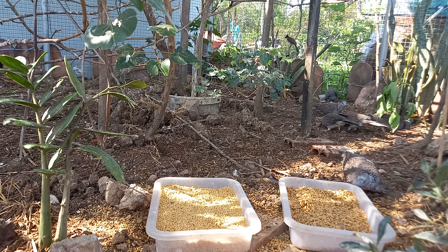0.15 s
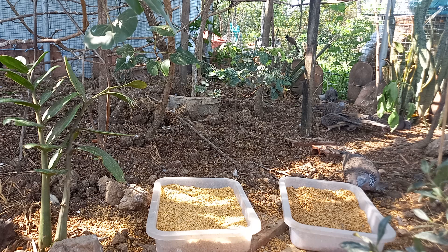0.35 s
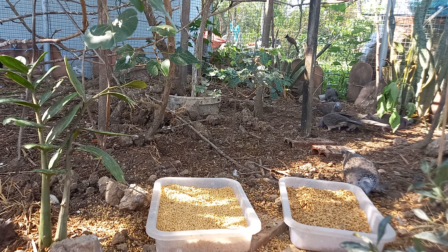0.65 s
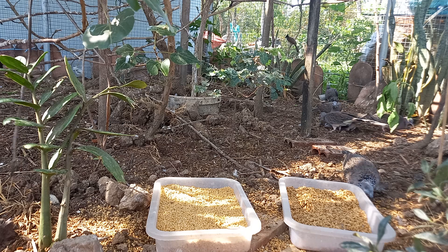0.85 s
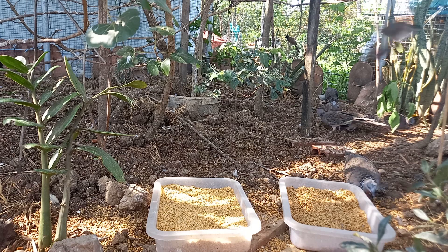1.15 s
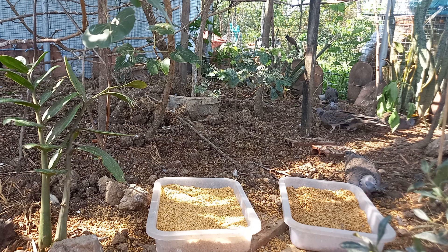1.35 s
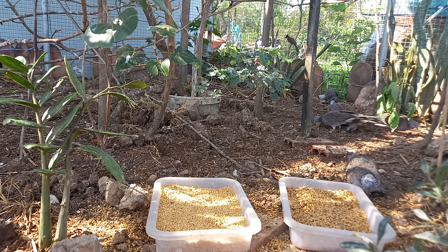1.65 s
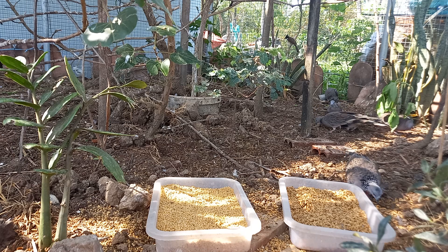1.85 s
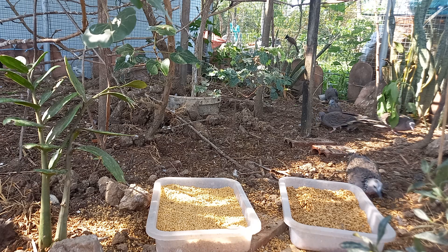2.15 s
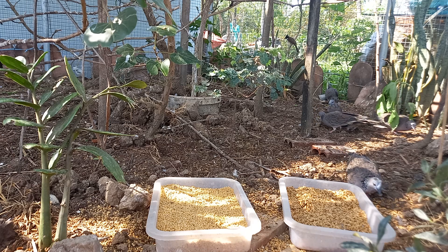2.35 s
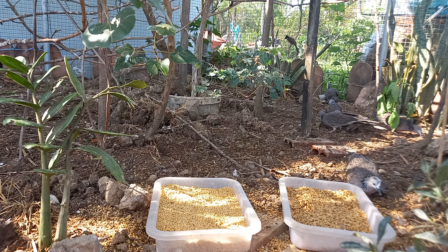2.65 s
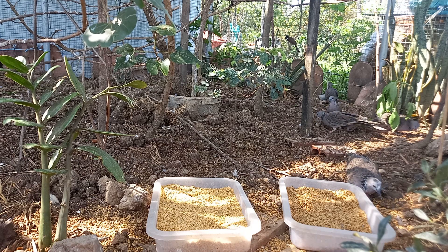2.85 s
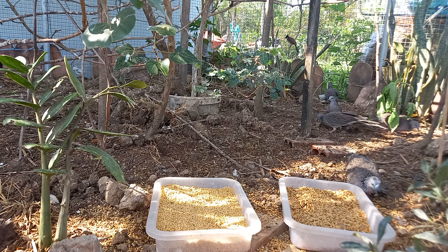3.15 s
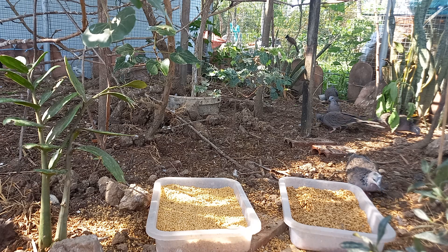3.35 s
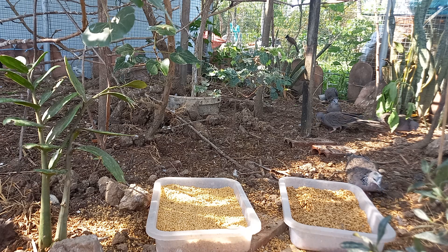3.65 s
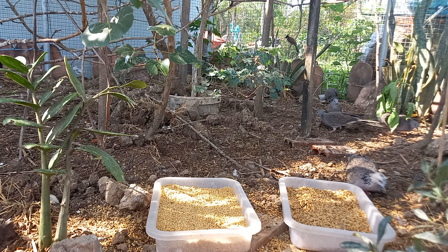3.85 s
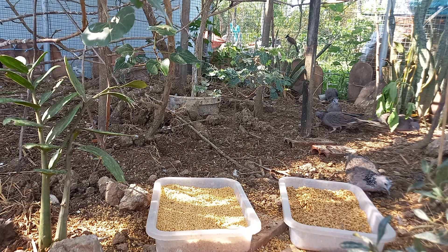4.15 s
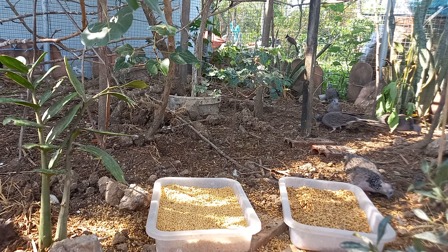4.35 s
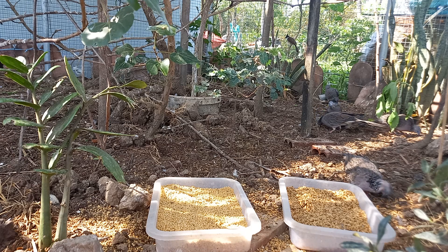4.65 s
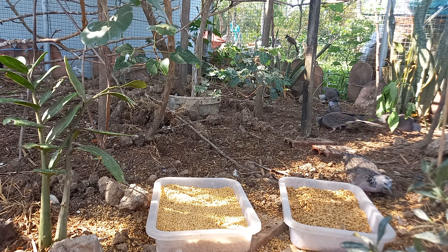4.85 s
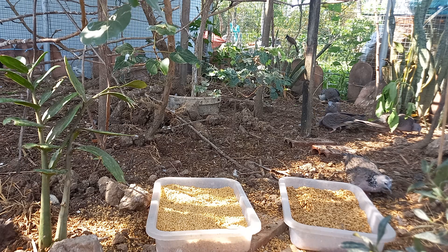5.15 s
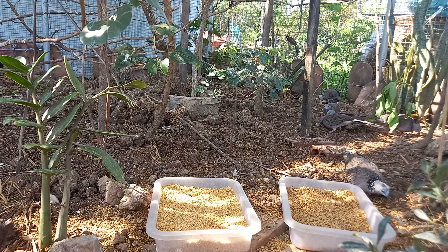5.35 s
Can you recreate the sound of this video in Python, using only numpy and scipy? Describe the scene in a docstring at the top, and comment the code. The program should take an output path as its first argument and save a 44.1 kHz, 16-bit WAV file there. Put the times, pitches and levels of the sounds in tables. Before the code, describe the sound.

Small birds whistle and chirrup sharply in an outdoor aviary while a dove coos, with a short burst of wing flapping midway.

```python
"""Small birds whistle, warble and rasp from several perches in an outdoor aviary while doves coo.
Each voice is a warbling tone in a band of rasp, bent along arch-shaped notes or three-pulse coos.
Shaped noise makes the rest: feet and beaks scratch in seed and dry litter, and one bird takes off
with a burst of wingbeats, its wing tips snapping against twigs. Low rumble and leaf hiss lie
underneath; walls and roof give a short echo, different at each of the two microphones."""
import sys
import numpy as np
from scipy import signal
from scipy.fft import rfft, irfft, next_fast_len
from scipy.io import wavfile
from scipy.ndimage import map_coordinates

SR = 44100
rng = np.random.default_rng(int(sys.argv[2]) if len(sys.argv) > 2 else 0)


def materialize(psi):
    """Save the field psi as 16-bit PCM at rate SR to the path in sys.argv[1].

    A 1-D psi becomes a single channel; in a 2-D psi each row is a channel.
    """
    bounded = np.clip(np.atleast_2d(psi).T, -1, 1)
    quanta = np.round(bounded * 32767).astype(np.int16)
    wavfile.write(sys.argv[1], SR, quanta)


N = 242978
TIME = np.arange(N) / SR  # s


def amp(db):
    """Decibels to gain."""
    return 10 ** (np.asarray(db) / 20)


def unit(x):
    """Scale to rms 1."""
    return x / np.sqrt(np.mean(x ** 2) + 1e-20)


def along(points, hz):
    """Read a curve of (Hz, value) points on a log frequency axis."""
    f, v = np.transpose(points)
    return np.interp(np.log(hz + 1), np.log(f + 1), v)


def wobble(rate, size=N):
    """A smooth random curve through normal random knots, rate knots a second."""
    knots = rng.standard_normal(int(size * rate / SR) + 4)
    return map_coordinates(knots, [np.arange(size) * rate / SR])


def filtered(x, response):
    """Multiply the spectrum of x by a complex response of frequency."""
    m = next_fast_len(N + SR // 2)
    return irfft(rfft(x, m) * response(np.fft.rfftfreq(m, 1 / SR)), m)[..., :N]


def rush(spectrum, side_db):
    """Coloured stereo noise of rms 1; side_db sets its width."""
    white = rng.standard_normal((2, N))
    mid, side = filtered(white, lambda hz: amp(along(spectrum, hz)) * hz / (hz + 10))
    side = amp(side_db) * side
    return unit(np.array([mid + side, mid - side]))


def echo(x):
    """Diffuse answer of walls and roof: decaying noise, strong at first from near surfaces."""
    # Each row: frequency in Hz, time in s for the long part of the echo to fall by 60 dB.
    decay_times = [(200, 0.25), (700, 0.65), (3000, 0.29), (6000, 0.35), (14000, 0.067)]
    hz, t, noise = signal.stft(rng.standard_normal((2, SR // 2)), SR, nperseg=256)
    long_part = amp(-60 * t / along(decay_times, hz)[:, None])
    near_part = 3.5 * amp(-60 * t / .09)
    tail = signal.istft(noise * (long_part + near_part), SR, nperseg=256)[1]
    tail = tail / np.linalg.norm(tail, axis=1, keepdims=True)
    delayed = np.pad(x, (SR // 400, 0))  # 2.5 ms
    return signal.fftconvolve(delayed[None], tail, axes=1)[:, :N]


def perch(x, lag_ms, pan_db, direct_db, echo_db):
    """Place a bird: the left microphone hears it lag_ms later and pan_db louder than the right."""
    sides = np.array([[.5], [-.5]])

    def late(hz, ms):
        return np.exp(-2j * np.pi * hz * ms / 1000)

    def wall(hz):  # one bright reflection, which beats against gliding notes
        return amp(-10.5) * hz / (hz + 1200) * late(hz, 13 + 0.43 * sides)

    direct = filtered(x, lambda hz: late(hz, sides * lag_ms) + wall(hz))
    return amp(direct_db + sides * pan_db) * direct + amp(echo_db) * echo(x)


def arches(rows, fade_db, fade_power, bend_power, edge_rasp):
    """(times, Hz, dB, rasp) of each note: away from its crest it bends in pitch, weakens, turns hoarser."""
    notes = []
    for crest, rise, fall, start_hz, crest_hz, end_hz, db, rasp in rows:
        t = TIME[(TIME > crest - rise) & (TIME < crest + fall)]
        away = np.maximum((crest - t) / rise, (t - crest) / fall)  # 0 at the crest, 1 at the ends
        outer_hz = np.where(t < crest, start_hz, end_hz)
        hz = crest_hz + (outer_hz - crest_hz) * away ** bend_power
        level_db = db - fade_db * away ** fade_power
        roughness = rasp + edge_rasp * away * np.where(t < crest, 1, .5)
        notes.append((t, hz, level_db, roughness))
    return notes


def voice(notes, warble_hz, swing, flutter_db, rasp_db, rasp_ratio, rasp_width_hz, lowest_hz, overtones=()):
    """A syrinx: a warbling tone inside a band of rasp, which the throat cuts off below lowest_hz."""
    clear, hoarse = np.zeros((2, N))
    for t, hz, db, rasp in notes:
        span = np.searchsorted(TIME, t)
        rasp = np.clip(rasp, 0, 1)

        def chance(rate):
            return wobble(rate, size=len(t))

        warble = np.sin(2 * np.pi * np.cumsum(warble_hz * (1 + .2 * chance(59.77))) / SR)
        waver = .22 * chance(110) + rasp * (warble + .5 * chance(3 * warble_hz))  # even clear notes wander
        phase = 2 * np.pi * np.cumsum(hz * (1 + swing * waver)) / SR

        def fuzzy(k):  # a noise band around k times the pitch
            return chance(rasp_width_hz) * np.cos(k * phase) + chance(rasp_width_hz) * np.sin(k * phase)

        tone = np.sin(phase) + sum(amp(level) * fuzzy(round(k)) for k, level in overtones)
        edge = np.clip(np.minimum(t - t[0], t[-1] - t) / 0.0058, 0, 1)  # ramps of 5.8 ms
        gate = np.sin(np.pi / 2 * edge) ** 2
        throb_db = flutter_db * rasp * (warble + .5 * chance(warble_hz))  # loudness follows the warble
        effort = gate * amp(db + throb_db)
        clear[span] += effort * np.sqrt(2 - 1.5 * rasp ** 2) * tone  # rasp takes strength from the tone
        hoarse[span] += effort * rasp * fuzzy(rasp_ratio)
    return clear + amp(rasp_db) * filtered(hoarse, lambda hz: 1 - 1 / (1 + (hz / lowest_hz) ** 20))


def outdoors():
    """Distant rumble that wavers a little and a soft hiss of leaves that comes and goes, both shaped noise."""
    # Spectrum of the rumble. Each row: frequency in Hz, relative level in dB per Hz.
    rumble_spectrum = [(13, -49.5), (22, -22.5), (38, -1.5), (92, 2), (311, -20.5), (443, -21.5),
                       (502, -20), (631, -23.5), (689, -24.5), (1110, -35.5), (1330, -51), (1500, -51),
                       (1950, -59), (3300, -120)]
    # Spectrum of the leaves. Each row: frequency in Hz, relative level in dB per Hz.
    leaf_spectrum = [(1000, -12), (2400, -11), (3700, -0.5), (5000, -5.5), (6500, -13), (10000, -16.5),
                     (16000, -31.5)]
    # Coming and going of the leaves. Each row: time in s, level in dB before the leaf gain.
    leaf_levels = [(0.0, -65.5), (0.54, -69), (0.75, -69.5), (1.09, -69.5), (1.26, -79.5), (1.47, -72.5),
                   (1.64, -67.5), (2.19, -79), (3.85, -62), (3.96, -64), (4.14, -73.5), (4.54, -70),
                   (4.66, -75.5), (4.88, -72), (4.99, -66), (5.51, -73.5)]
    leaf_gain_db, rumble_level_db = 6, -59
    hiss_db = np.interp(TIME, *np.transpose(leaf_levels)) + leaf_gain_db
    rumble = amp(rumble_level_db + 2.6 * wobble(17.0)) * rush(rumble_spectrum, side_db=-12.5)
    hiss = amp(hiss_db + 1.8 * wobble(9)) * rush(leaf_spectrum, side_db=0.5)
    return rumble + hiss


def wings():
    """Each wingbeat pushes air and swishes feathers, easing away from a crest; tips snap against twigs."""
    # Wing tips striking twigs. Each row: start in s, relative level in dB.
    snap_hits = [(3.6319, -31.5), (3.7151, -22), (3.8857, -47)]
    # Low push of air. Each row: frequency in Hz, relative level in dB per Hz.
    push_spectrum = [(15, -40), (25, -20.5), (58, -1), (75, -6), (237, -21.5), (306, -29), (400, -34),
                     (520, -50), (880, -120)]
    # Whoosh of the beat. Each row: frequency in Hz, relative level in dB per Hz.
    whoosh_spectrum = [(150, -10.5), (300, -9.5), (550, 10), (850, -7.5), (1150, 3), (1600, -13),
                       (3000, -11), (6000, -24.5)]
    # Feather rustle, also the colour of the snaps. Each row: frequency in Hz, relative level in dB per Hz.
    feather_spectrum = [(1000, -14), (3000, 3.5), (5000, -6), (7000, -8.5), (10000, -10.5), (13000, -3.5),
                        (16000, -12)]
    takeoff_s, landed_s, ramp_s = 3.55, 4.22, 0.071  # start, end and fade of the flight
    crest_s, spread_s = 3.812, .25  # hardest beating, time to either side in which it eases
    flap_hz = 24.97  # mean wingbeat rate

    flying = np.clip(np.minimum(TIME - takeoff_s, landed_s - TIME) / ramp_s, 0, 1)
    ease = ((TIME - crest_s) / spread_s) ** 2
    beat = np.sin(2 * np.pi * np.cumsum(flap_hz * (1 + 0.019 * wobble(8))) / SR)

    def swell(top_db, ease_db, beat_db, rough_db):
        return amp(top_db - ease_db * ease + beat_db * beat + rough_db)

    push = swell(top_db=-41.0, ease_db=13.0, beat_db=-1.0, rough_db=3.7 * wobble(22.14))
    push = push * rush(push_spectrum, side_db=-16.0)
    whoosh = swell(top_db=-46.5, ease_db=17.5, beat_db=3.0, rough_db=2.2 * wobble(35))
    whoosh = whoosh * rush(whoosh_spectrum, side_db=-10.5)
    rustle_db = 2.6 * wobble(900) + 1.2 * wobble(70)
    feathers = swell(top_db=-49.5, ease_db=5.5, beat_db=1.2, rough_db=rustle_db)
    feathers = feathers * rush(feather_spectrum, side_db=2)

    snaps = np.zeros(N)
    for start, db in snap_hits:
        age = np.maximum(TIME - start, 0)
        decay = amp(-60 * age / 0.018) + 0.84 * amp(-60 * age / .13)  # a sharp crack and a longer rattle
        snaps += (TIME > start) * amp(db - 9.0) * decay
    return flying * (push + whoosh + feathers) + snaps * rush(feather_spectrum, side_db=1)


def scratching():
    """Feet and beaks stir dry grains: brief pecks start at once, long scrapes swell, single husks tick."""
    # Pecks and scrapes in seed and litter. Each row: start in s, relative level in dB, length in s.
    stroke_rows = [(.778, -69, .027), (.905, -72.5, .53), (1.086, -67.5, .048), (1.178, -60, .03),
                   (1.982, -66.5, .053), (2.258, -72, .064), (2.476, -62, .046), (2.838, -62, .094),
                   (3.058, -65.5, .046), (3.12, -61.5, .084), (3.163, -62, .041), (3.297, -55, .027),
                   (3.363, -58.5, .16), (4.432, -61.5, .033), (4.506, -59.5, .041), (5.206, -71, .25)]
    # Dry litter. Each row: frequency in Hz, relative level in dB per Hz.
    litter_spectrum = [(600, -13.5), (2000, -2.5), (4500, 0.5), (7000, 2), (9500, 0.5), (12000, -1),
                       (16000, -1.5)]
    stroke = np.zeros(N)
    for start, db, length in stroke_rows:
        age = np.maximum(TIME - start, 0)
        onset = 1 - np.exp(-age / (.8 * length ** 2))
        stroke += amp(db) * onset * np.exp(-(age / length) ** 1.5)
    grains = unit(amp(2.5 * wobble(780) + 2 * wobble(45)))
    husks = (rng.random(N) < 22 / SR) * amp(2.4 * rng.standard_normal(N))  # about 22 a second
    ticks = signal.fftconvolve(husks, amp(-60 * TIME[:SR // 50] / 0.004))[:N]
    stirred = amp(4.0) * stroke * (grains + 2 * ticks)
    stray = amp(-67.0) * ticks  # husks tick between the strokes too
    return (stirred + stray) * rush(litter_spectrum, side_db=0.5)


def coo_notes():
    """Each coo scoops up and sinks in three pulses, over a short throat tone."""
    # The near dove's coos. Each row: start in s, length in s, top pitch in Hz before scoop and sag,
    # relative level in dB, rasp 0-1 at the start.
    coo_rows = [(-.008, .42, 725, -43, 0.23), (1.251, 0.44, 722.7, -46.5, 0.27),
                (2.458, .41, 705, -41, 0.21)]
    # The pulses of every coo. Each row: centre and half width as shares of its length, level in dB.
    pulse_rows = [(.23, .2, .5), (.56, .075, -.5), (.84, .1, 2.5)]
    pulse_edge_db = 9  # drop at a pulse's half width
    end_rasp = 0.13  # a coo grows rougher as it runs out
    scoop_hz, scoop_s = 115, .012  # slides up towards its top pitch
    sag_hz, sag_power = 133, 2.2  # then sinks ever faster
    throat_hz, throat_db, throat_rise_s, throat_fall_s = 610, -10.5, 0.027, .12  # lower tone at the start

    notes = []
    for start, length, top_hz, db, rasp in coo_rows:
        t = TIME[(TIME > start) & (TIME < start + length)]
        gone = (t - start) / length
        hz = top_hz - scoop_hz * np.exp((start - t) / scoop_s) - sag_hz * gone ** sag_power
        pulses_db = np.max([level - pulse_edge_db * ((gone - centre) / half) ** 2
                            for centre, half, level in pulse_rows], axis=0)
        notes.append((t, hz, db + pulses_db, rasp + end_rasp * gone ** 3))
        throat = (start + throat_rise_s, throat_rise_s, throat_fall_s,
                  throat_hz, throat_hz, throat_hz, db + throat_db, .4)
        notes += arches([throat], fade_db=8, fade_power=1.3, bend_power=1, edge_rasp=.2)
    return notes


def doves():
    """Nearly pure falling coos with a throaty start, and softer murmuring coos between and after them."""
    # Murmurs. Each row: crest, rise and fall in s, start, crest and end pitch in Hz,
    # relative level in dB, rasp 0-1 at the crest.
    murmur_rows = [ (.925, .045, 0.11, 611, 580, 541, -57, 0.73),
                   (2, 0.066, 0.15, 649, 652, 621, -54, 0.87), (2.135, .06, .15, 625, 590, 495, -53.5, 1),
                   (3.135, .02, 0.061, 620, 600, 574, -61.5, 0.31),
                   (4.04, 0.021, 0.058, 560, 566, 618, -50.5, 0.73),
                   (4.11, 0.066, 0.092, 640, 678, 623, -49.5, .5),
                   (4.41, 0.079, 0.13, 674, 709, 673, -51.5, 0.8),
                   (4.605, .11, 0.097, 676, 616, 560, -46.5, 0.95),
                   (5.15, .06, 0.034, 590, 559, 554, -52.5, 0.29),
                   (5.272, 0.037, 0.052, 580, 575, 610, -50.5, 0.47),
                   (5.335, 0.062, 0.079, 614, 648, 639, -52, 0.71)]
    near = voice(coo_notes(), warble_hz=93.8, swing=.008, flutter_db=5, rasp_db=-1, rasp_ratio=.89,
                 rasp_width_hz=130, lowest_hz=474, overtones=[(2, -43)])
    murmurs = arches(murmur_rows, fade_db=10, fade_power=1.47, bend_power=1.2, edge_rasp=.1)
    soft = voice(murmurs, warble_hz=45, swing=.025, flutter_db=1.5, rasp_db=-3, rasp_ratio=1,
                 rasp_width_hz=110, lowest_hz=490)
    return (perch(near, lag_ms=-.18, pan_db=.5, direct_db=-3, echo_db=-9.5)
            + perch(soft, lag_ms=-.18, pan_db=0, direct_db=-1, echo_db=-9))


def buzzing_bird():
    """A faint high buzz, a pitch deep in rasp, heard only through the echo."""
    # Each row: crest, rise and fall in s, start, crest and end pitch in Hz,
    # relative level in dB, rasp 0-1 at the crest.
    buzz_rows = [ (.45, .6, .95, 5800, 5700, 5170, -66, 0.67),
                 (3.07, .11, 0.078, 4400, 4620, 4280, -61.5, 0.68),
                 (4.5, .4, 0.23, 5680, 5600, 5260, -68, 0.89)]
    notes = arches(buzz_rows, fade_db=12, fade_power=1.8, bend_power=2.0, edge_rasp=0.3)
    buzz = voice(notes, warble_hz=120, swing=.04, flutter_db=1, rasp_db=-2, rasp_ratio=1,
                 rasp_width_hz=900, lowest_hz=3500)
    return amp(-1.0) * echo(buzz)


def hoarse_and_trilling_birds():
    """Low hoarse notes and a trilling voice with a slower warble, from one perch."""
    # Hoarse notes. Each row: crest, rise and fall in s, start, crest and end pitch in Hz,
    # relative level in dB, rasp 0-1 at the crest.
    hoarse_rows = [ (.79, .012, .04, 1380, 1350, 1380, -62, 0.14),
                   (1.21, 0.022, .035, 1386, 1354, 1340, -70.5, .2),
                   (2.28, 0.01, .06, 1370, 1344, 1307, -66, 0.34),
                   (3.08, .012, .045, 1375, 1370, 1370, -62.5, .25),
                   (3.123, 0.0079, 0.031, 1384, 1360, 1320, -40, 0.5),
                   (3.172, .018, 0.031, 1355, 1343, 1380, -45.5, 0.29),
                   (3.17, 0.058, 0.042, 1584, 1830, 1890, -56.5, 0.64)]
    # Trilling notes. Each row: crest, rise and fall in s, start, crest and end pitch in Hz,
    # relative level in dB, rasp 0-1 at the crest.
    trill_rows = [ (2.08, .062, .06, 1600, 1830, 1960, -51, 0.9),
                  (5.295, 0.025, 0.025, 2100, 2045, 2280, -45.5, 0.43),
                  (5.322, .022, 0.11, 2550, 2570, 2154, -44, 0.66),
                  (5.398, 0.0099, 0.03, 2144, 2188, 2022, -36.5, 0.34),
                  (5.47, .03, 0.015, 1677, 1803, 2070, -57.5, 0.56)]
    hoarse_notes = arches(hoarse_rows, fade_db=13.5, fade_power=0.88, bend_power=1.2, edge_rasp=.1)
    hoarse = voice(hoarse_notes, warble_hz=107.3, swing=0.11, flutter_db=0.0, rasp_db=-5, rasp_ratio=0.94,
                   rasp_width_hz=720, lowest_hz=850, overtones=[(2, -50.0)])
    trill_notes = arches(trill_rows, fade_db=15, fade_power=1.2, bend_power=1.1, edge_rasp=.25)
    trill = voice(trill_notes, warble_hz=47, swing=.08, flutter_db=6, rasp_db=-4, rasp_ratio=.88,
                  rasp_width_hz=1300, lowest_hz=1420, overtones=[(2, -24)])
    return perch(hoarse + trill, lag_ms=-0.11, pan_db=0.5, direct_db=1.5, echo_db=-5.5)


def far_bird():
    """Raspy warbled notes from farther off, with more echo against the direct sound."""
    # Each row: crest, rise and fall in s, start, crest and end pitch in Hz,
    # relative level in dB, rasp 0-1 at the crest.
    far_rows = [ (.705, 0.034, 0.029, 2383, 2735, 3180, -32, 0.55),
                (.765, .035, 0.021, 3166, 3345, 2980, -29.5, 0.78),
                (.968, 0.047, .02, 1860, 2078, 2150, -41.5, 0.59),
                (.992, 0.013, 0.018, 2190, 2100, 2054, -32.5, 0.17),
                (1.06, 0.036, 0.02, 2710, 3016, 2420, -34.5, 0.8),
                (1.098, 0.017, 0.012, 2365, 2245, 2320, -31, 0.092),
                (1.155, 0.049, 0.091, 2530, 2986, 2657, -38.5, 0.49),
                (2.653, .018, 0.024, 1844, 2200, 2530, -38, 0.47),
                (2.692, 0.031, 0.031, 2484, 2800, 2880, -34, 0.22),
                (2.735, 0.011, 0.018, 2450, 2200, 2050, -35.5, 0.14),
                (2.785, .02, 0.018, 2450, 2436, 2130, -40.5, 0.66),
                (2.818, 0.013, 0.11, 2140, 1998, 1320, -45.5, 0.29),
                (3.295, 0.038, 0.053, 1807, 2080, 2020, -41.5, 1),
                (3.31, .018, 0.02, 3650, 3732, 3680, -25.5, 0.28),
                (3.427, .038, 0.073, 2460, 3015, 2460, -31.5, 0.82),
                (3.565, .035, 0.04, 2620, 2610, 2740, -38, 0.84),
                (3.618, .034, 0.075, 2747, 3127, 2230, -35, 1),
                (3.78, .042, 0.033, 2656, 2600, 2890, -33.5, 1),
                (3.83, 0.045, 0.14, 2950, 2778, 2240, -31, 0.23),
                (3.972, 0.026, 0.044, 2340, 2207, 2033, -33, 0.12),
                (4.05, 0.036, 0.05, 2040, 1890, 1460, -43, 0.16)]
    notes = arches(far_rows, fade_db=10, fade_power=0.9, bend_power=1.25, edge_rasp=.3)
    far = voice(notes, warble_hz=74.9, swing=0.065, flutter_db=4.0, rasp_db=-6.5, rasp_ratio=.92,
                rasp_width_hz=1300, lowest_hz=1626)
    return perch(far, lag_ms=0.34, pan_db=.5, direct_db=-1.5, echo_db=-4)


def shrill_notes():
    """One two-part call, repeated: a rising chip and a rolling chirrup, each timed from its own cue."""
    # Chip. Each row: crest in s after the cue, rise and fall in s, start, crest and end pitch in Hz,
    # level in dB before the call's own, rasp 0-1 at the crest.
    chip = [ (-.038, .046, 0.027, 2455, 2798, 3280, -26.5, 0.85),
            (0, .028, 0.024, 3542, 3757, 3670, -16.5, 0.36)]
    # Chirrup. Each row: crest in s after the cue, rise and fall in s, start, crest and end pitch in Hz,
    # level in dB before the call's own, rasp 0-1 at the crest.
    chirrup = [ (.008, .01, .02, 3100, 3350, 3900, -26.5, .9),
               (.031, 0.025, .02, 3900, 4280, 3900, -30.5, .25),
               (.057, .008, .022, 3850, 3746, 3540, -17.5, 0.31),
               (.078, .018, .028, 3686, 3556, 3970, -19, .3), (.103, 0.02, .035, 3750, 4200, 3850, -23, .5),
               (.141, 0.0079, 0.03, 3800, 3608, 3333, -19.5, 0.56),
               (.18, .032, 0.0374, 3300, 3074, 2878, -25, 0.67)]
    # Calls. Each row: cue of the chip in s, cue of the chirrup in s, level in dB added to every note.
    calls = [(1.52, 1.595, -1.7), (4.897, 4.96, -1.37)]
    notes = []
    for chip_s, chirrup_s, call_db in calls:
        for cue, part in ((chip_s, chip), (chirrup_s, chirrup)):
            for crest, *shape, db, rasp in part:
                notes.append((cue + crest, *shape, db + call_db, rasp))
    return notes


def shrill_bird():
    """A piercing call with weak hoarse overtones, stronger at the right microphone."""
    notes = arches(shrill_notes(), fade_db=10.5, fade_power=1.3, bend_power=1.2, edge_rasp=.25)
    shrill = voice(notes, warble_hz=87.0, swing=0.052, flutter_db=3.5, rasp_db=-4.5, rasp_ratio=.87,
                   rasp_width_hz=1100, lowest_hz=2596, overtones=[(2, -35.5), (3, -47), (4, -50.5)])
    return perch(shrill, lag_ms=0.19, pan_db=-2.5, direct_db=-3.5, echo_db=-8)


def near_bird():
    """Quick whistles from a near perch: a gliding tone with fuzzy overtones."""
    # Each row: crest, rise and fall in s, start, crest and end pitch in Hz,
    # relative level in dB, rasp 0-1 at the crest.
    near_rows = [ (.003, .02, 0.031, 3550, 3598, 3503, -22, 0.19),
                 (.137, 0.039, 0.023, 1987, 2349, 2374, -31.5, 0.27),
                 (.172, 0.03, .026, 2356, 2453, 2530, -26, 0.39),
                 (.219, .042, .034, 2800, 2974, 2870, -22.5, 0.19),
                 (.407, 0.044, 0.03, 2706, 3720, 3910, -25, 0.44),
                 (.512, 0.023, 0.016, 2257, 2277, 2480, -34.5, 0.6),
                 (.576, 0.067, .078, 2683, 3090, 2742, -20, 0.17),
                 (.595, 0.022, 0.034, 3900, 4060, 3920, -38, 0.47)]
    # Overtones of the whistle. Each row: multiple of the pitch, level in dB.
    whistle_overtones = [(2, -30), (3, -41), (4, -41), (5, -50.5), (6, -37.5)]
    notes = arches(near_rows, fade_db=17, fade_power=1.75, bend_power=1.8, edge_rasp=0.28)
    near = voice(notes, warble_hz=128.3, swing=0.048, flutter_db=10.5, rasp_db=-3, rasp_ratio=0.94,
                 rasp_width_hz=1400, lowest_hz=2130, overtones=whistle_overtones)
    return perch(near, lag_ms=0.087, pan_db=.5, direct_db=1.0, echo_db=-5.0)


def songbirds():
    """Small birds on several perches."""
    return buzzing_bird() + hoarse_and_trilling_birds() + far_bird() + shrill_bird() + near_bird()


def scene():
    """Everything in the aviary, from the background to the birds."""
    return outdoors() + wings() + scratching() + doves() + songbirds()


def record(dry):
    """The recorder sheds the deepest bass and keeps nothing above its band limit."""
    top_hz, bass_hz = 15850, 30
    return filtered(dry, lambda hz: (hz < top_hz) * (1 - 1 / (1 + (hz / bass_hz) ** 4)))


dry = scene()
out = record(dry)
materialize(out)
```